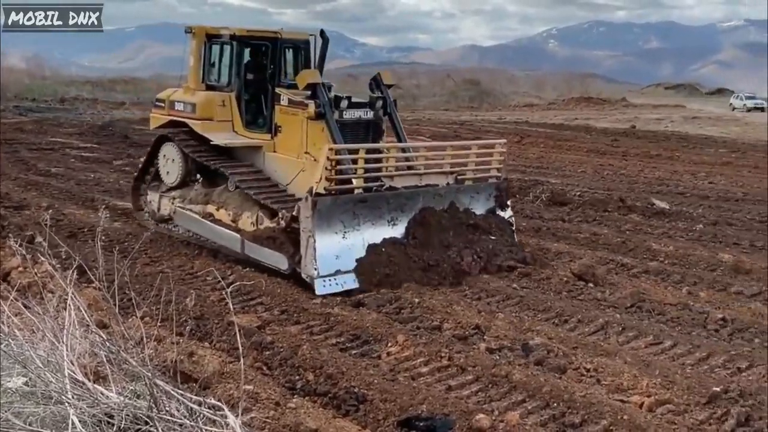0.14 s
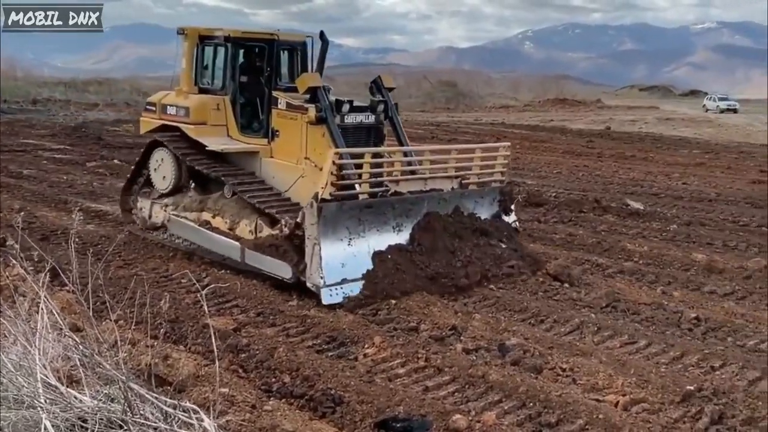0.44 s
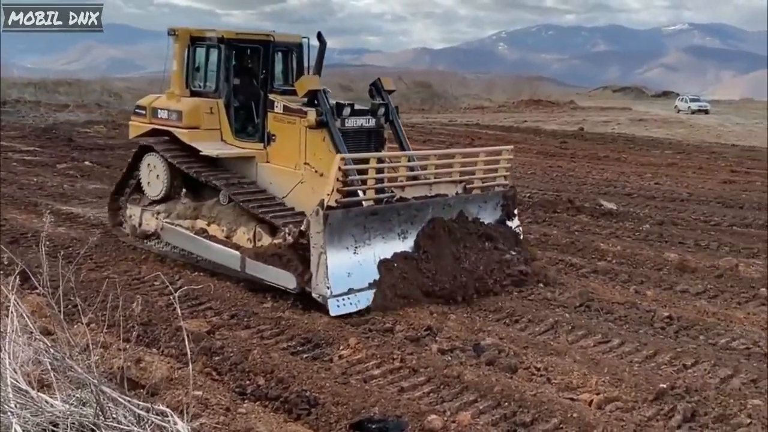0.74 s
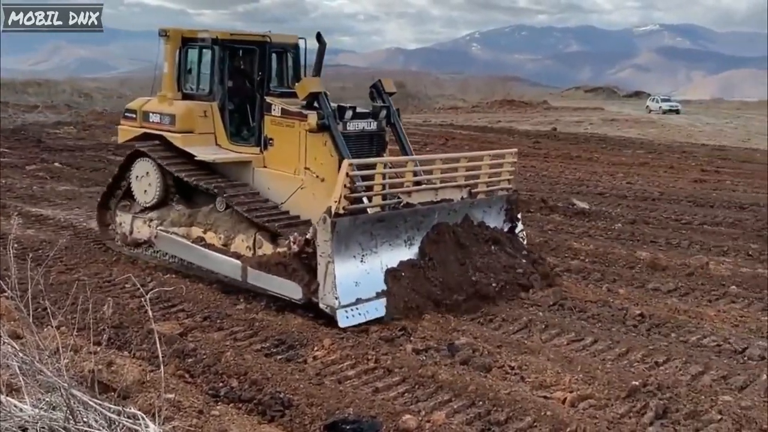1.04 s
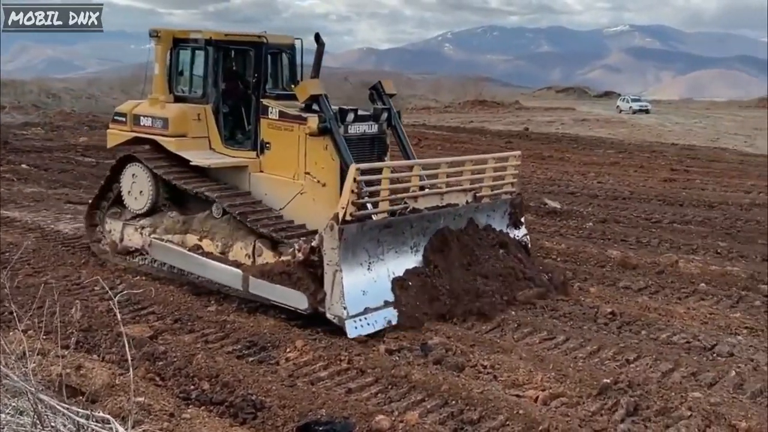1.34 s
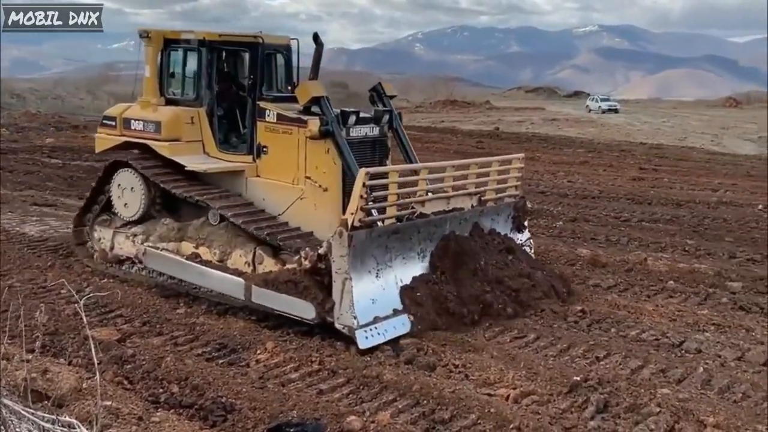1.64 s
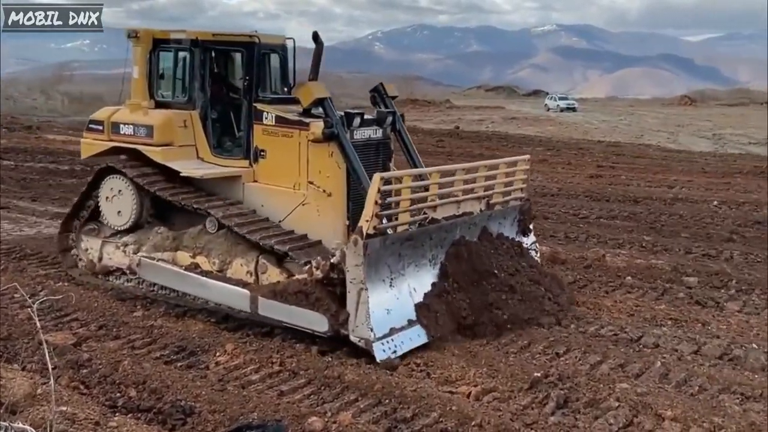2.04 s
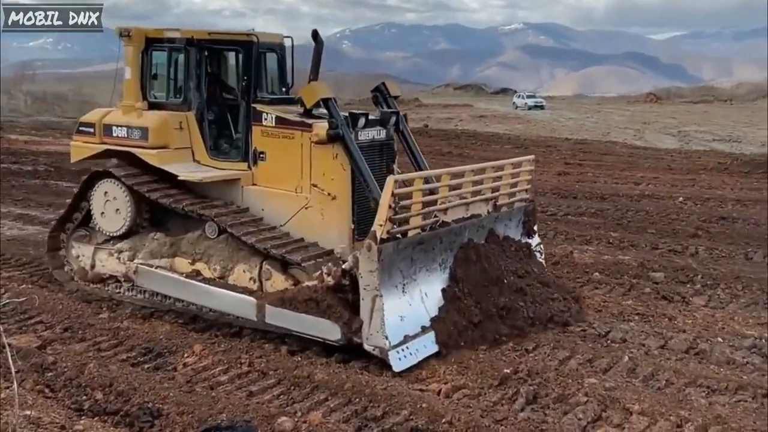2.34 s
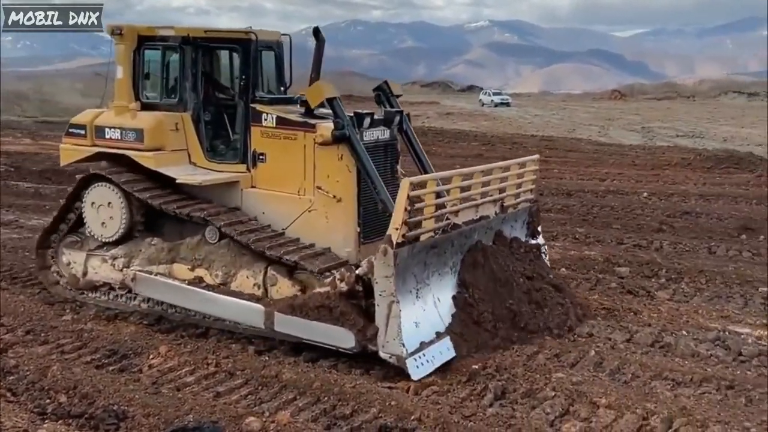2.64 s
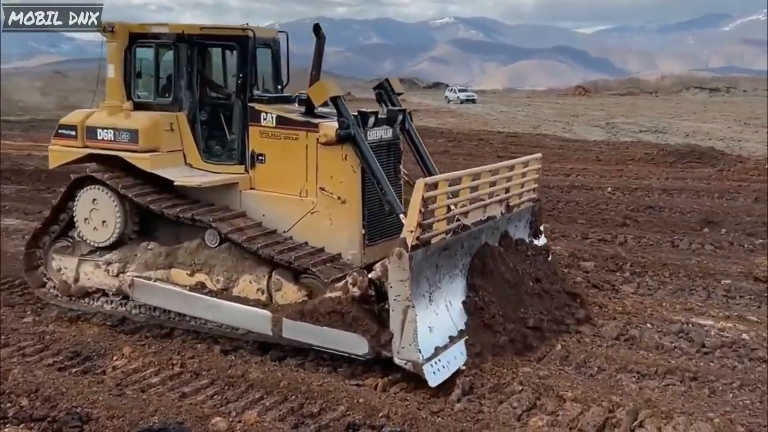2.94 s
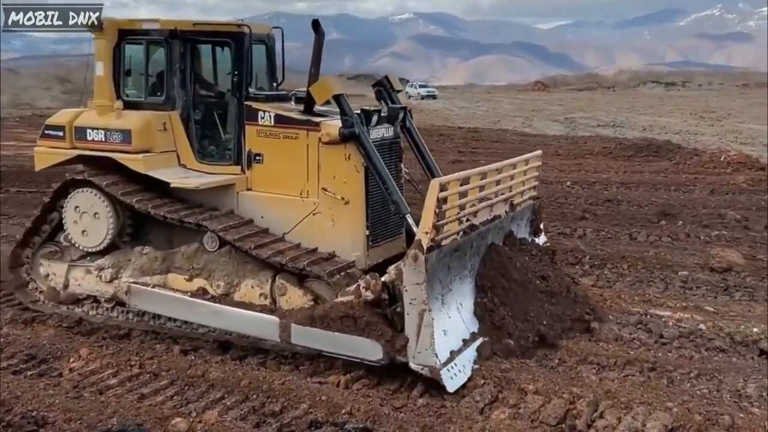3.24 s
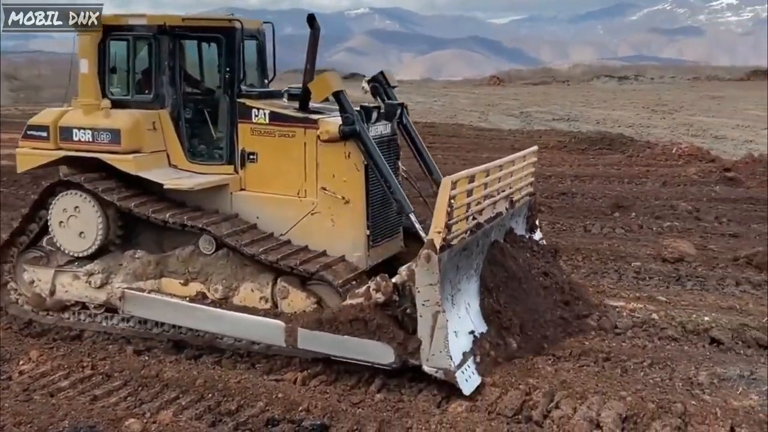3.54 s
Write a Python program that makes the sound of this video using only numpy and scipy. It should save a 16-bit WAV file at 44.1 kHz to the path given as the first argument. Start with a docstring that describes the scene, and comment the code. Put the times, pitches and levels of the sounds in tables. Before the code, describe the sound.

A bulldozer's diesel engine drones low and steady under load, close and slightly left, with grinding tracks and irregular metallic clanks growing denser after the middle; wind buffets the stereo microphones in the open field.

```python
"""The six-cylinder diesel of a bulldozer pushing soil across an open field holds a nearly steady speed: cosines locked
to the firing phase give the exhaust beat and weaker shaft orders, beside fan and pump tones. Shaped noise makes the
low roar, the body and track grind, the squeaking pins and the air hiss; track links clank as decaying modes, and loose
steel rattles on every second firing. Level sets the machine left of centre; wind buffets the stereo microphones."""
import sys
import numpy as np
from scipy import signal
from scipy.fft import rfft, irfft, next_fast_len
from scipy.io import wavfile
from scipy.ndimage import uniform_filter1d, map_coordinates

SR = 44100
rng = np.random.default_rng(int(sys.argv[2]) if len(sys.argv) > 2 else 0)


def to_wav(sig):
    """Store sig (one row per channel, or 1-D mono) as 16-bit WAV at the path in sys.argv[1].

    Samples outside -1..1 are clipped; the rate is SR.
    """
    pcm = np.clip(np.atleast_2d(sig), -1, 1) * 32767
    pcm = np.round(pcm).astype(np.int16)
    wavfile.write(sys.argv[1], SR, pcm.T)  # frames by channels


N = 163170
T = np.arange(N) / SR  # time, s


def amp(db):
    """Decibel law: amplitude ratio of a level in dB."""
    return 10 ** (np.asarray(db) / 20)


def unit(x):
    """Normalisation to an rms of 1."""
    return x / np.sqrt(np.mean(x ** 2) + 1e-20)


def along(points, hz):
    """Interpolation of (frequency, value) points on a logarithmic frequency axis."""
    f, v = np.transpose(points)
    return np.interp(np.log(hz + 1), np.log(f + 1), v)


def spectrum(points):
    """Spectral shaping: the amplitude response through (frequency, dB) points."""
    return lambda hz: amp(along(points, hz))


def curves(rows):
    """Linear interpolation in time: one curve for each column after the time."""
    s, *columns = np.transpose(rows)
    return [np.interp(T, s, column) for column in columns]


def wobble(rate):
    """Slow random modulation: a smooth curve through `rate` random knots a second."""
    knots = rng.standard_normal(int(N * rate / SR) + 4)
    return map_coordinates(knots, [T * rate])


def filtered(x, response):
    """Linear filtering: the spectrum of x times a complex response of frequency."""
    m = next_fast_len(N + SR // 2)
    return irfft(rfft(x, m) * response(np.fft.rfftfreq(m, 1 / SR)), m)[..., :N]


def rush(response, patchy_db, gate=1):
    """Turbulence-like noise: an independent pair of joint rms 1, its gain patchy in time and frequency."""
    z = signal.stft(gate * rng.standard_normal((2, N)), nperseg=512)[2]
    over_frequency = uniform_filter1d(rng.standard_normal(z.shape[1:]), 5, 0)
    patches = unit(uniform_filter1d(over_frequency, 10, 1))
    pair = signal.istft(z * amp(patchy_db * patches), nperseg=512)[1][:, :N]
    return unit(filtered(pair, response))


def bursts(times, db, rise_s):
    """Superposition of impulses, each spread into a short swell that peaks after rise_s."""
    spikes = np.bincount((times * SR).astype(int) % N, amp(db), N)
    u = np.arange(SR // 20) / SR / rise_s
    return signal.fftconvolve(spikes, (u * np.exp(1 - u)) ** 2)[:N]


def resonances(modes):
    """Modal superposition: second-order resonances (Hz, width Hz, dB) summed with alternating sign."""
    def response(f):
        total = 0
        for k, (centre, width, db) in enumerate(modes):
            damping = 1j * f * width
            total = total + (-1) ** k * amp(db) * damping / (centre * centre - f * f + damping)
        return total
    return response


# Firing rate of the engine: start_s [s], firing_rate [firings per s]
FIRING_RATE = [(0, 96.8), (1.7, 96.62), (2.3, 96.22), (3.7, 96.38)]
FIRST_FIRING_S = .009


def firings():
    """Phase as the integral of rate: firings counted since the first one."""
    rate, = curves(FIRING_RATE)
    return np.cumsum(rate) / SR - rate[0] * FIRST_FIRING_S


# Wind level: start_s [s], level_db [dB]
GUSTS = [(0, -21), (.55, -22), (.8, -33), (1.05, -20), (1.5, -27.5), (1.75, -18.5), (2.35, -19), (2.8, -33),
         (3.2, -26), (3.7, -42)]
# Wind spectrum before the extra roll-off: pitch_hz [Hz], level_db [relative dB per Hz]
BUFFET = [(20, -38), (45, -7), (80, -7), (130, -4), (300, -9), (600, -20.5)]
LUMP_DB, LUMPS_PER_S, BUFFET_PATCHY_DB = 2.5, 18, 1.5


def wind():
    """Turbulent pressure on the microphone ports: lumpy low noise, incoherent from port to port."""
    lumps = amp(LUMP_DB * np.array([wobble(LUMPS_PER_S), wobble(LUMPS_PER_S)]))
    falling = lambda hz: spectrum(BUFFET)(hz) / (1 + (hz / BUFFET[-1][0]) ** 2)
    return amp(curves(GUSTS)[0]) * unit(lumps * rush(falling, BUFFET_PATCHY_DB))


# Hiss spectrum: pitch_hz [Hz], level_db [relative dB per Hz]
HISS = [(1500, -9), (3000, -2), (4000, 1), (6000, -3.5), (8000, -2.5), (9500, -19), (11200, -4),
        (12800, -13), (15500, -66)]
# Hiss level before flutter: start_s [s], level_db [dB]
HISS_LEVEL = [(0, -37.5), (1.0, -38), (1.45, -42), (1.75, -39.5), (1.92, -40), (2.15, -37), (2.5, -32.5),
              (2.62, -38.5), (2.73, -33.5), (2.9, -40.5), (3.35, -36), (3.7, -36)]
HISS_FLUTTER_DB = 1.5


def air_hiss():
    """Broadband flow noise of the engine air, its level modulated by a quick flutter."""
    level_db = curves(HISS_LEVEL)[0] + HISS_FLUTTER_DB * wobble(20)
    return amp(level_db) * rush(spectrum(HISS), patchy_db=2.0)


# Modes of the loose steel: pitch_hz [Hz], width_hz [Hz], level_db [relative dB]
RATTLER = [(4610, 280, 1), (5000, 250, 0.5), (5250, 340, -0.5), (5650, 240, 3.5), (6180, 230, -0.5),
           (7010, 136, 1), (7600, 220, -1.5), (8940, 300, -6.5), (11450, 160, -7.5)]
# Rattle level: start_s [s], level_db [dB]
RATTLE_LEVEL = [(0, -40), (.84, -39), (.91, -31.5), (1.35, -41), (1.68, -40.5), (1.79, -34.5), (1.9, -43.5),
                (2.17, -34), (2.27, -49), (2.37, -37.5), (2.5, -36), (2.65, -41), (2.95, -43), (3.33, -37),
                (3.7, -41.5)]
RATTLE_LAG_S, RATTLE_RISE_S, RATTLE_SPREAD_DB = .0085, .0065, 2.2
RATTLE_BUZZ = .25  # steady excitation between bursts


def steel_rattle():
    """Resonance under impact: noise bursts after every second firing excite the modes of loose steel."""
    every_second = np.diff(np.floor(firings() / 2)) > 0
    times = T[1:][every_second] + RATTLE_LAG_S
    gate = bursts(times, RATTLE_SPREAD_DB * rng.standard_normal(len(times)), RATTLE_RISE_S)
    return amp(curves(RATTLE_LEVEL)[0]) * rush(resonances(RATTLER), 2.6, gate + RATTLE_BUZZ)


GRIND_PER_S, GRIND_DB, GRIND_SPREAD_DB = 90, -9, 7  # spread is the greatest deviation either way


def track_knocks():
    """Amplitude modulation by random impacts: many small track knocks over a steady excitation."""
    draws = rng.random((int(GRIND_PER_S * N / SR), 2))
    times = draws[:, 0] * N / SR
    levels_db = GRIND_DB + GRIND_SPREAD_DB * (2 * draws[:, 1] - 1)
    return 3.0 + bursts(times, levels_db, rise_s=0.0047)


# Track pin bands before the response is squared: pitch_hz [Hz], width_hz [Hz], level_db [relative dB]
PINS = [(1261, 56, -3), (1660, 164, -1), (2254, 174, -3), (2713, 93, -1.5), (3018, 160, -4)]
# Squeak level: start_s [s], level_db [dB]
SQUEAK_LEVEL = [(0.05, -37.5), (1.71, -38.5), (1.89, -50), (2.09, -38.5), (2.6, -34.5), (2.9, -38),
                (3.1, -34), (3.43, -31.5), (3.6, -38)]


def pin_squeaks(knocks):
    """Narrow-band resonance: knock-roughened noise through the squared response of the track pins."""
    squared = lambda hz: resonances(PINS)(hz) ** 2
    return rush(squared, 3.1, knocks) * amp(curves(SQUEAK_LEVEL)[0])


# Loudest track clanks: start_s [s], level_db [dB], pitch_hz of the favoured mode [Hz]
CLANKS = [(0.086, -17, 625), (0.469, -16, 490), (0.881, -16, 900), (1.099, -20, 1180), (1.312, -15, 625),
          (1.344, -17, 800), (1.562, -19, 500), (1.682, -18, 1180), (1.700, -16, 1080), (1.839, -19, 480),
          (1.937, -14, 625), (1.949, -20, 1650), (2.045, -20, 1000), (2.109, -16, 720), (2.152, -12, 510),
          (2.2, -15, 490), (2.357, -18, 750), (2.694, -16, 1000), (2.795, -18, 800), (2.94, -12, 1190),
          (3.049, -18, 1000), (3.104, -15, 680), (3.228, -12, 700), (3.32, -18, 1200), (3.45, -13, 820),
          (3.559, -14, 1000), (3.685, -17, 2200)]
# Link modes before stretching and scatter: pitch_hz [Hz], level_db [relative dB], t60_s [s]
LINKS = [(430, -3, .11), (625, -1, .11), (820, -4, .1), (1180, -1, .09), (1650, -5, .08), (2250, -7, .07),
         (2730, -11, .06)]
LINK_SCATTER_DB, FOCUS_DB_PER_OCTAVE = 2.5, 8
CRACK_DB, CLANK_RISE_S = 0, .001


def track_clanks():
    """Modal decay after impact: link modes, stretched to put one on the clank's pitch, ring with a short crunch."""
    out, t = np.zeros(N + SR), np.arange(SR // 5) / SR
    for start_s, db, top_hz in CLANKS:
        # The nearest mode moves onto the pitch; modes further away lose level.
        stretch = min((top_hz / hz for hz, *_ in LINKS), key=lambda r: abs(np.log(r)))
        ring = 0
        for hz, level, t60 in LINKS:
            pitch = hz * stretch
            focus_db = -FOCUS_DB_PER_OCTAVE * abs(np.log2(pitch / top_hz))
            mode_db = level + focus_db + rng.normal(0, LINK_SCATTER_DB)
            ring = ring + amp(mode_db - 60 * t / t60) * np.sin(2 * np.pi * (pitch * t + rng.random()))
        crunch = uniform_filter1d(rng.standard_normal(len(t)), size=9)
        crunch = crunch * amp(CRACK_DB - 60 * t / 0.031)
        onset = 1 - np.exp(-t / CLANK_RISE_S)
        out[round(start_s * SR):][:len(t)] += amp(db) * (ring + crunch) * onset
    return out[:N]


# Engine block and track grind spectrum: pitch_hz [Hz], level_db [relative dB per Hz]
BODY = [(200, -22), (380, -8), (500, -0.5), (557, -2), (620, -2), (718, -6), (1180, -10.5), (1340, -16.5),
        (1590, -13.5), (1930, -18.5), (2230, -17.5), (2500, -22.5), (3760, -28), (6000, -43)]
# Body level: start_s [s], level_db [dB]
BODY_LEVEL = [(0, -22), (.81, -22.5), (1.6, -24), (1.72, -21.5), (1.92, -26), (2.1, -22), (2.71, -23),
              (3.7, -21.5)]
BODY_PATCHY_DB = 1.6


def body_grind(knocks):
    """Structure-borne noise: the block and track spectrum, roughened by the knocks."""
    return rush(spectrum(BODY), BODY_PATCHY_DB, knocks) * amp(curves(BODY_LEVEL)[0])


# Low roar spectrum of exhaust and tracks: pitch_hz [Hz], level_db [relative dB per Hz]
RUMBLE = [(20, -32), (35, -12.5), (60, 3), (90, 7), (140, 2.5), (240, 3.5), (320, 3.5), (370, -5),
          (500, -9), (900, -61)]
# Roar level: start_s [s], level_db [dB]
RUMBLE_LEVEL = [(0, -18.5), (.6, -19.5), (1.4, -21), (1.9, -17.5), (2.7, -18.5), (3.2, -18), (3.7, -18.5)]
RUMBLE_PATCHY_DB = 1.5


def low_roar():
    """Broadband low-frequency radiation of exhaust and tracks, as shaped noise."""
    return rush(spectrum(RUMBLE), RUMBLE_PATCHY_DB) * amp(curves(RUMBLE_LEVEL)[0])


CYLINDERS = 6  # firings per engine cycle
# Exhaust beat: start_s [s], level_db of harmonics 1, 2 and 3 of the firing rate [dB rms]
EXHAUST = [(0, -16.5, -15.5, -18.5), (1.3, -15, -16, -19.5), (3.7, -16.5, -16, -22)]
# Lines of unequal cylinders and gears, before waver: order [multiple of the engine cycle], level_db [dB rms]
ORDER_LINES = [(14, -31), (15, -30), (16, -34), (20, -33), (38, -39), (42, -41), (43, -43), (50, -41),
               (66, -43)]
# Gear and pump growls that come and go: order [multiple of the engine cycle]
GROWL_ORDERS = [25.6, 30, 39]
# Growl levels before waver: start_s [s], level_db for each growl order in turn [dB rms]
GROWLS = [(0, -26.5, -47, -45), (.55, -37, -28.5, -30), (.9, -46, -41, -35), (1.6, -34, -46, -31),
          (1.8, -63, -32, -40), (2.2, -60, -43, -30.5), (3.7, -30.5, -38, -40)]
# Fan and pump tones before waver: pitch_hz [Hz], level_db [dB rms]
TONES = [(114, -29.5), (593, -41.5)]
ORDER_WAVER_DB, TONE_WAVER_DB = 2, 2.5
TONE_DRIFT = 0.19  # phase wander, radians


def engine():
    """Harmonic synthesis: in-phase exhaust harmonics push once a firing; orders and tones waver."""
    turn = 2 * np.pi * firings()
    beat = sum(amp(db) * np.cos((k + 1) * turn) for k, db in enumerate(curves(EXHAUST)))
    orders = 0
    for order, db in list(ORDER_LINES) + list(zip(GROWL_ORDERS, curves(GROWLS))):
        level = amp(db + ORDER_WAVER_DB * wobble(9.9))
        orders = orders + level * np.cos(order * turn / CYLINDERS + rng.uniform(0, 2 * np.pi))
    tones = 0
    for hz, db in TONES:
        level = amp(db + TONE_WAVER_DB * wobble(1.7))
        tones = tones + level * np.cos(2 * np.pi * hz * T + TONE_DRIFT * wobble(4.25))
    return np.sqrt(2) * (beat + orders + tones)  # peak from rms


# Coherence of the noises between the sides: pitch_hz [Hz], likeness [correlation, 1 = alike]
ALIKE = [(100, .9), (640, .98), (1410, .93), (2000, .75), (3100, .82), (6820, .75), (12000, .8)]
# Level difference, left over right: pitch_hz [Hz], level_db [dB]
LEFT_OVER_RIGHT = [(200, 0), (500, .5), (1290, 1.5), (2380, 1.5), (4400, 3), (8120, .5), (15000, 0)]
# Phase difference that spreads the treble: pitch_hz [Hz], lead of left over right [radians]
TREBLE_PHASE = [(300, 0), (2150, .3), (3270, 1.1), (5340, .55), (7840, .9), (11000, 1.5)]


def scene():
    """Partial coherence widens the noises; level sets the machine left of centre; phase spreads the treble."""
    knocks = track_knocks()  # shared by body and pins
    direct, scattered = low_roar() + body_grind(knocks) + pin_squeaks(knocks) + steel_rattle() + air_hiss()
    angle = lambda hz: np.arccos(np.clip(along(ALIKE, hz), -1, 1)) / 2
    mid = filtered(direct, lambda hz: np.cos(angle(hz))) + engine() + track_clanks()
    side = filtered(scattered, lambda hz: np.sin(angle(hz)))
    # Half of each difference goes to either side.
    tilt = lambda hz: amp(along(LEFT_OVER_RIGHT, hz) / 2) * np.exp(.5j * along(TREBLE_PHASE, hz))
    both = lambda hz: np.array([tilt(hz), 1 / tilt(hz)])
    return filtered(np.array([mid + side, mid - side]), both) + wind()


CLIP_TOP, CLIP_HARD = .97, 8  # limiting amplitude, sharpness of the knee
TOP_HZ = 15850


def record(dry):
    """Saturation and band limiting: peaks are squeezed, then everything from TOP_HZ up is removed."""
    squeezed = dry / (1 + np.abs(dry / CLIP_TOP) ** CLIP_HARD) ** (1 / CLIP_HARD)
    return filtered(squeezed, lambda hz: hz < TOP_HZ)


dry = scene()
out = record(dry)
to_wav(out)
```